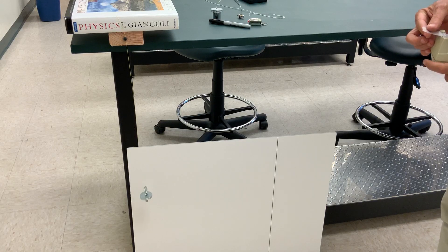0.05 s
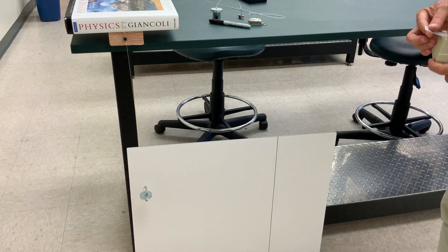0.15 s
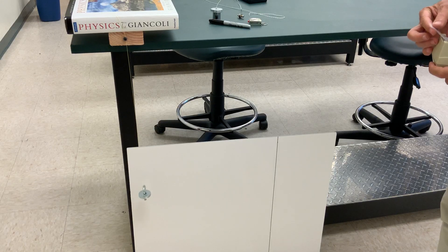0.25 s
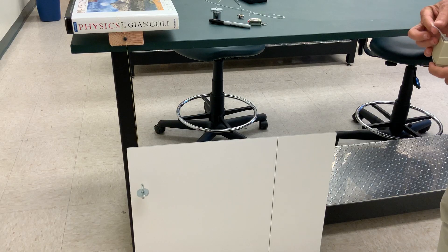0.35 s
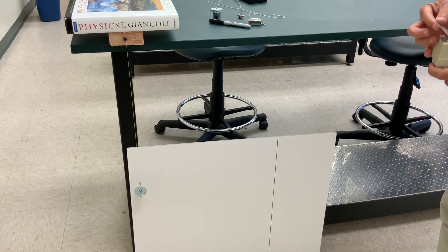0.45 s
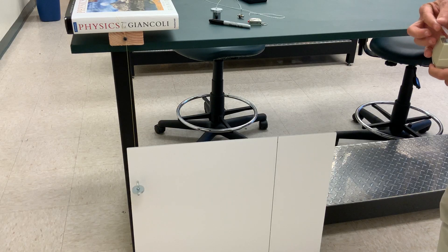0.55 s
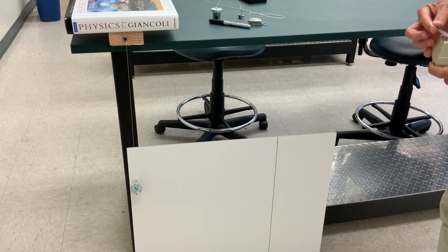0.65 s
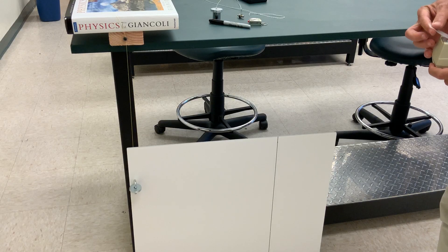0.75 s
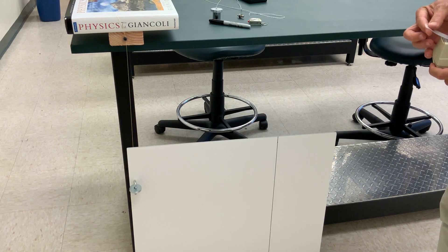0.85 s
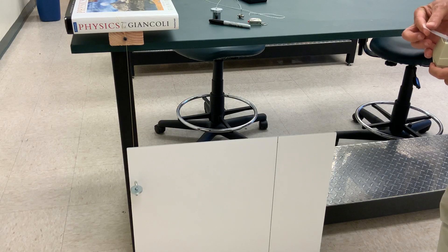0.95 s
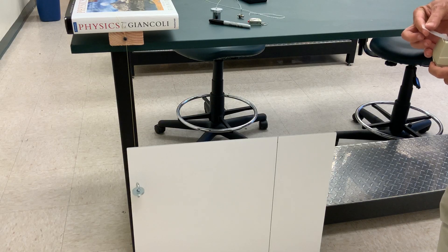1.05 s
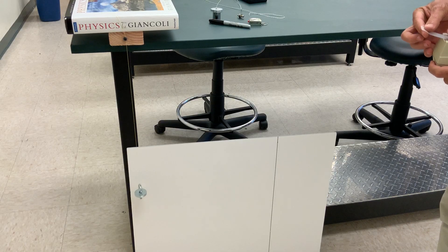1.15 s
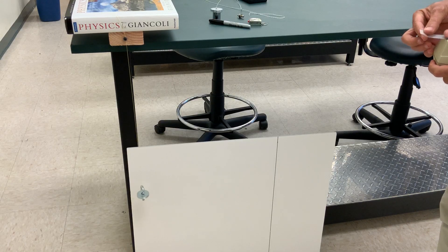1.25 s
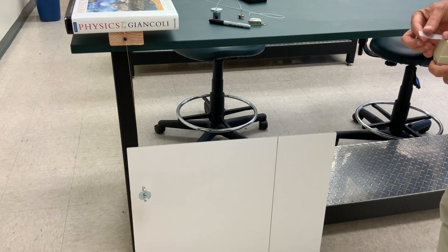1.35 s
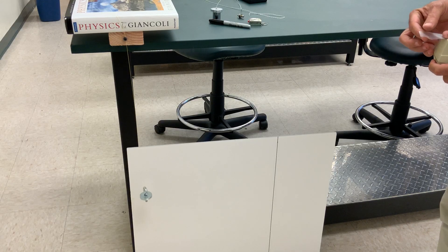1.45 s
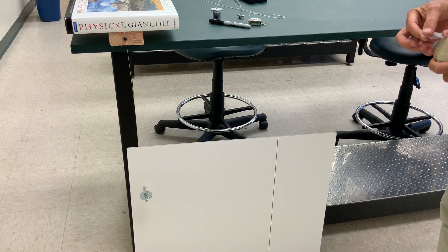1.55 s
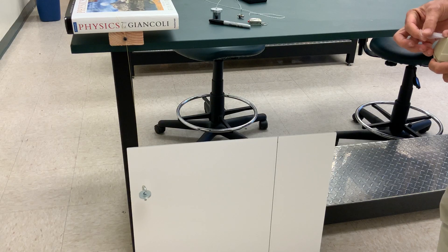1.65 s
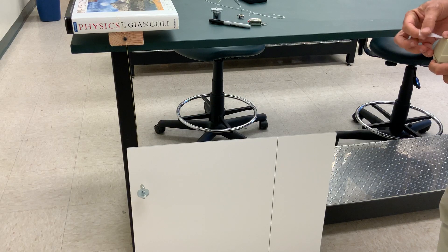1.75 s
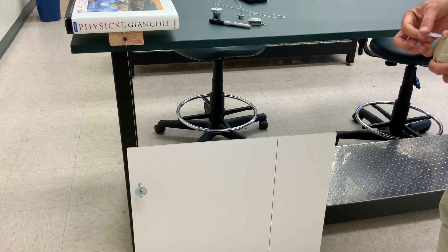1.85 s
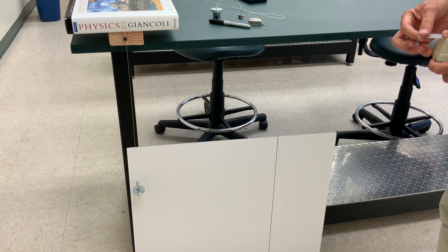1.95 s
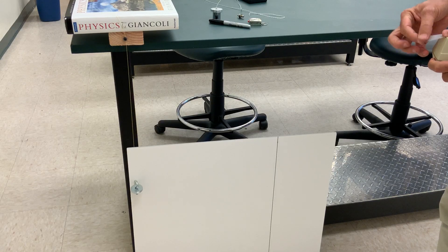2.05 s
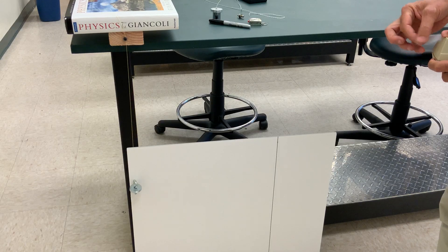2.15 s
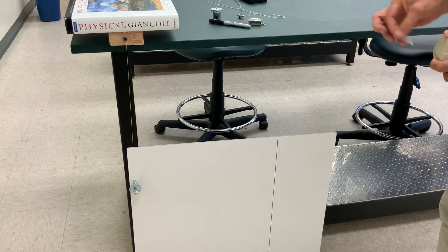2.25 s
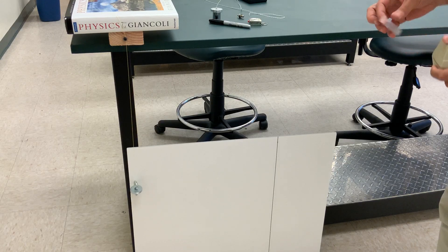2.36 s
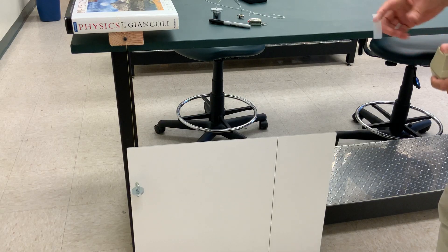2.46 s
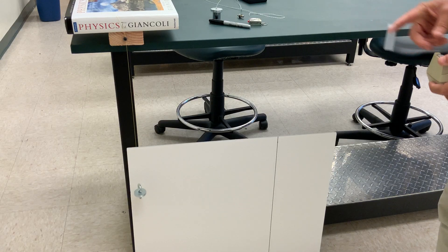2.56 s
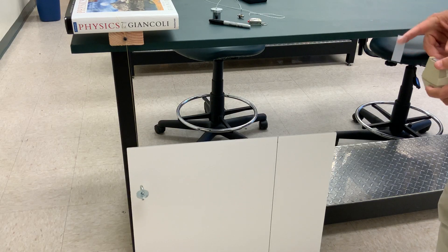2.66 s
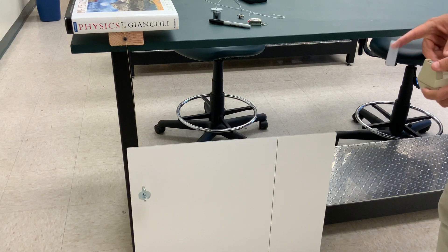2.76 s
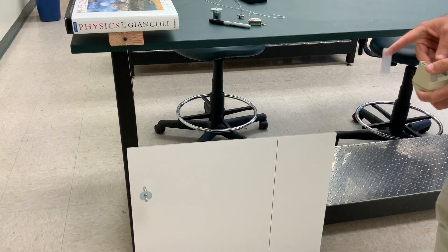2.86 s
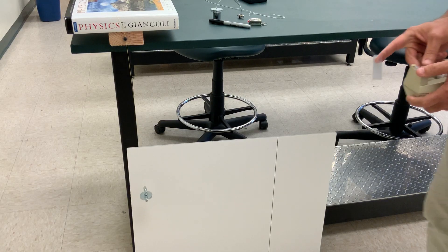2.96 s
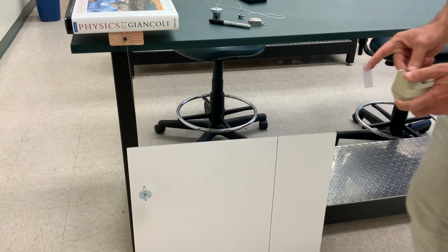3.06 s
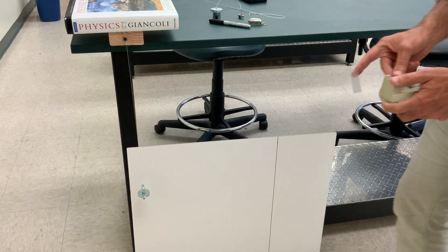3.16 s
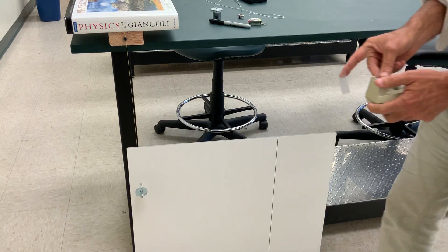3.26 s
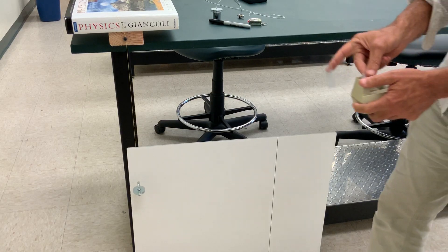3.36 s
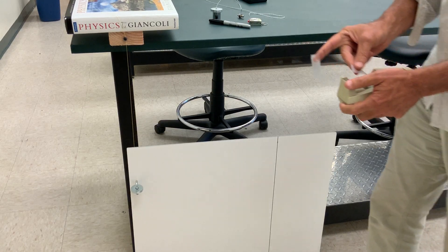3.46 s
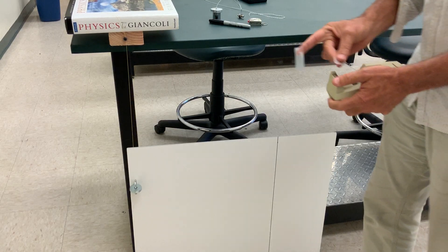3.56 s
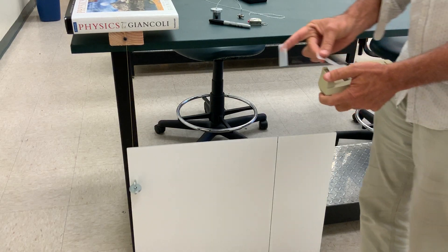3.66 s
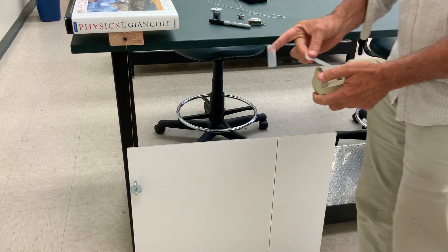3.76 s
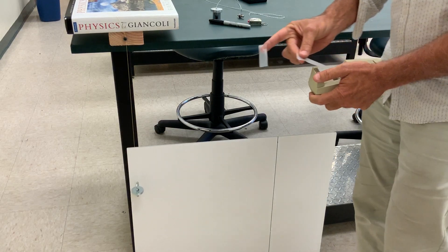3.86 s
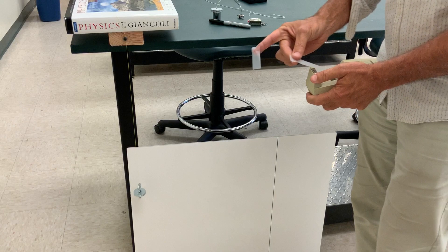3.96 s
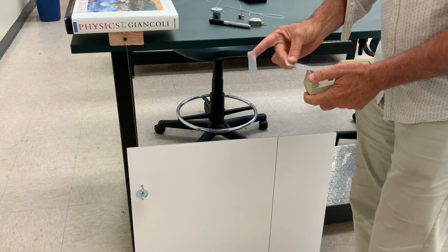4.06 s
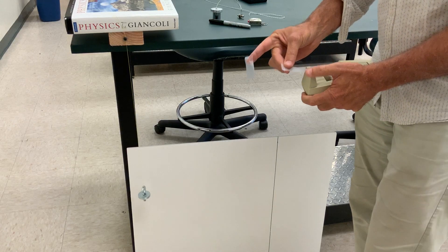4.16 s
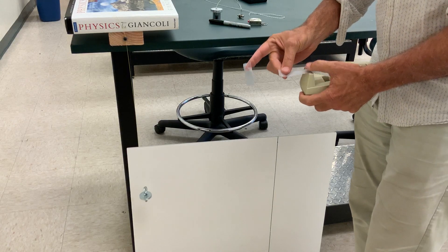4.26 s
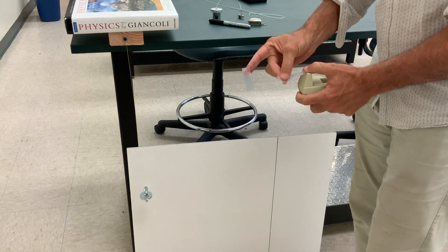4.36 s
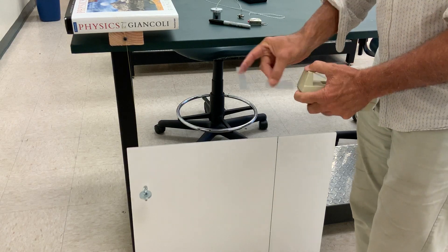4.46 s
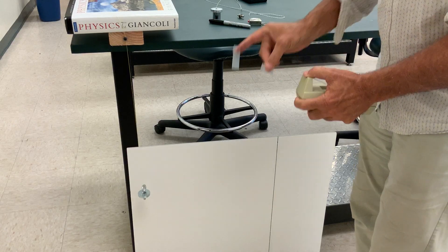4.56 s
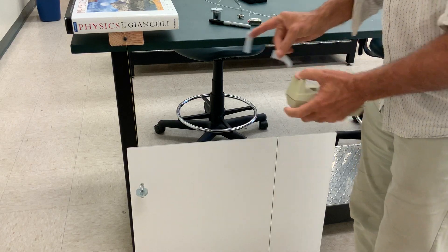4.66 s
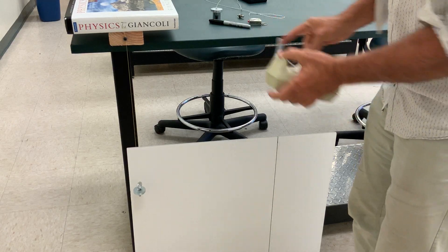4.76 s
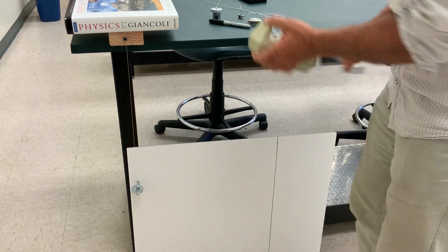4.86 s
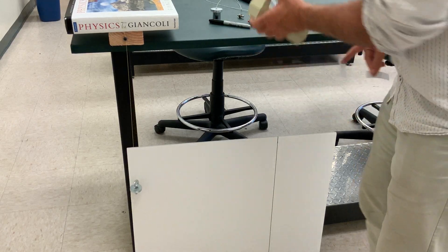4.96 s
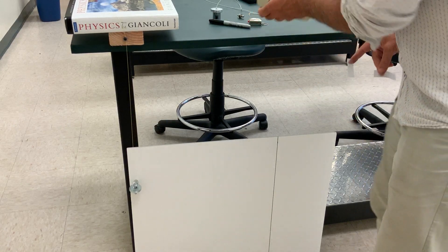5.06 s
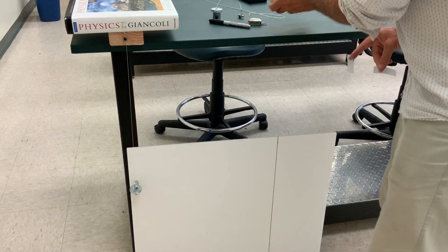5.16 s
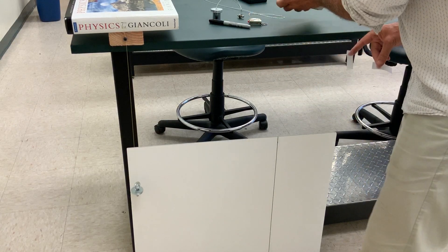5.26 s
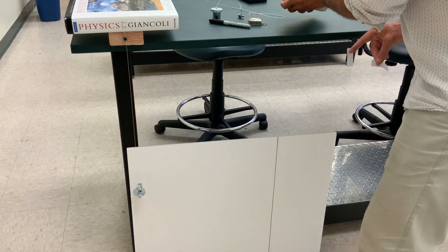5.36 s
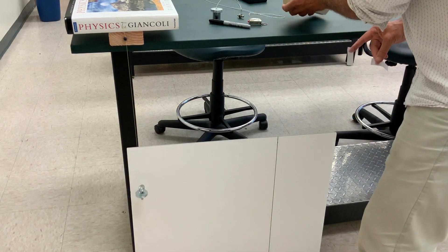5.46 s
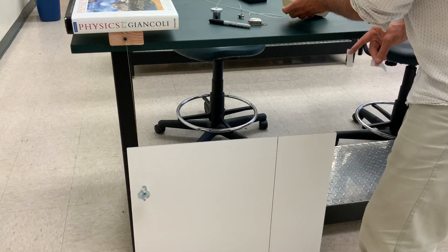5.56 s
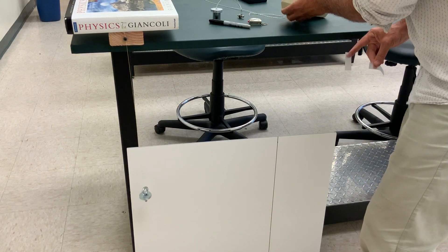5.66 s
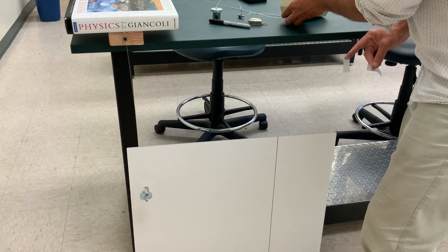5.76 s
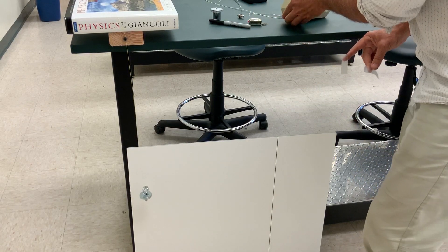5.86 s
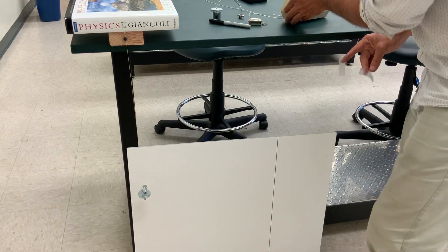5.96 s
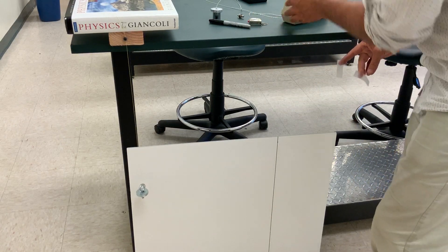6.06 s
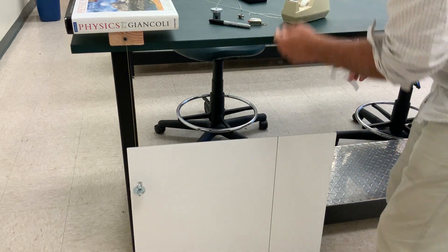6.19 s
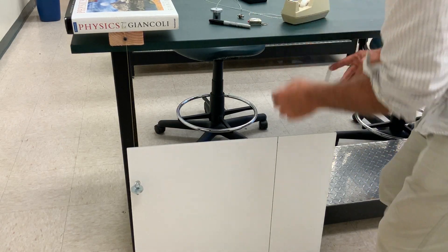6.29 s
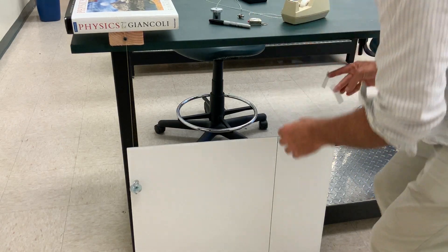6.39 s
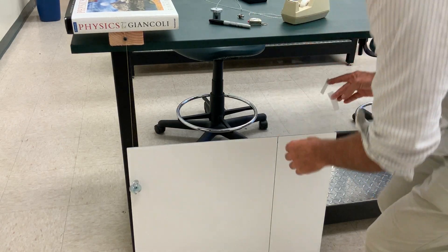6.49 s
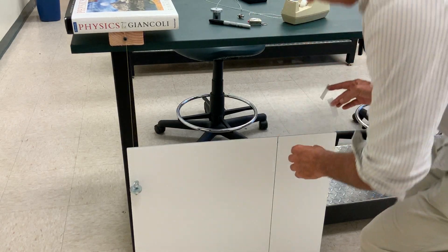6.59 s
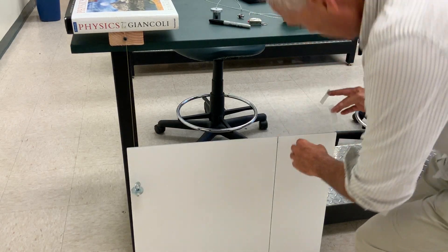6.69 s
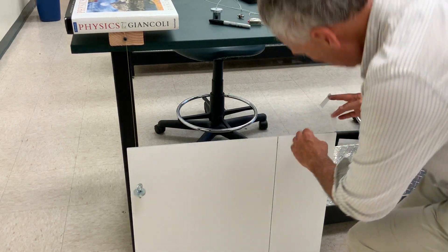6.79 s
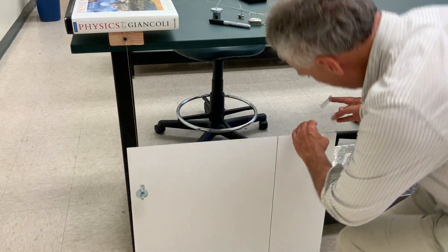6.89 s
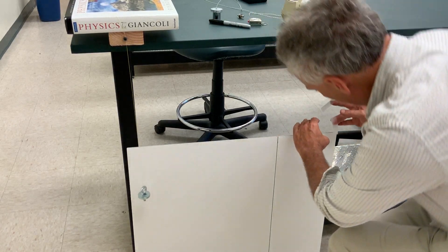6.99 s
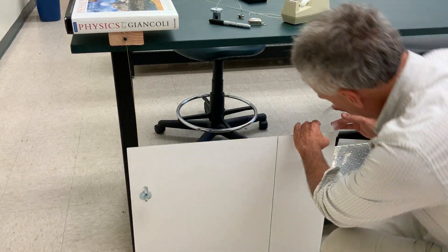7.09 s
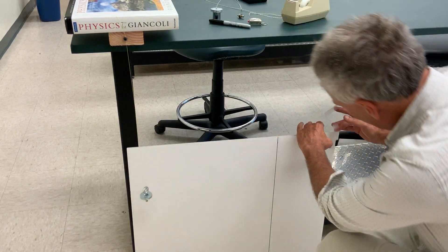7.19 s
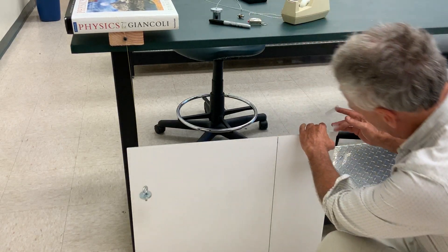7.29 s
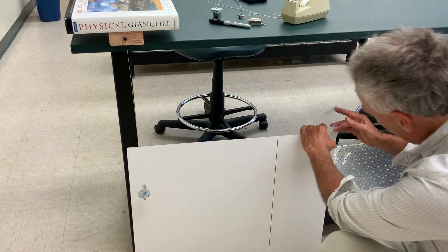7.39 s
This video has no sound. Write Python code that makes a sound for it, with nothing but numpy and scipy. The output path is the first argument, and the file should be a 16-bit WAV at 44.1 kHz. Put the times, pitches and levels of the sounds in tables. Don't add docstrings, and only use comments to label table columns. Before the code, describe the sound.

Close stereo pickup of tape being handled indoors: very brief snapping rips through a hollow plastic holder, echoing lightly off hard walls. Between them come sticky ticks, crinkles and a picked-free tape end whose pull sings softly upward. After the last rip, clothing brushes and plastic creaks, the holder thuds onto a tabletop, slides with a low boom, and soft rustling continues over steady ventilation.

```python
import sys
import numpy as np
from scipy import signal
from scipy.fft import rfft, irfft, next_fast_len
from scipy.io import wavfile
from scipy.ndimage import uniform_filter1d

SR = 44100
rng = np.random.default_rng(int(sys.argv[2]) if len(sys.argv) > 2 else 0)


def natural_amplitude(level_db):
    exponent = np.asarray(level_db, float) / 20
    return 10 ** exponent


def output_pcm(signal):
    pcm = np.clip(np.atleast_2d(signal).T, -1, 1) * 32767
    wavfile.write(sys.argv[1], SR, np.round(pcm).astype(np.int16))


N = 327698


def unit(x):
    return x / np.sqrt(np.mean(x ** 2) + 1e-20)


def in_time(rows):
    s, *columns = np.transpose(rows)
    t = np.arange(N) / SR
    return np.array([np.interp(t, s, c, left=-140, right=-140) for c in columns])


def band(x, low_hz, high_hz, order=2):
    edges = [low_hz, min(high_hz, .45 * SR)]
    return signal.sosfilt(signal.butter(order, edges, "band", fs=SR, output="sos"), x)


def low_pass(x, hz, order):
    return signal.sosfilt(signal.butter(order, hz, fs=SR, output="sos"), x)


def ring(x, hz, t60):
    r, w = natural_amplitude(-60 / (t60 * SR)), 2 * np.pi * hz / SR
    return signal.lfilter([0, np.sin(w)], [1, -2 * r * np.cos(w), r * r], x + 1e-18)


def flicker(rate, depth_db):
    knots = rng.standard_normal(4000)
    return natural_amplitude(depth_db * np.interp(np.arange(N) * rate / SR, np.arange(4000), knots))


def gestures(rows):
    t = np.arange(0, N + 64, 64) / SR
    power = 0
    for s, held, db, rise, fall in rows:
        outside = np.maximum((s - t) / rise, (t - s - held) / fall)
        power = power + natural_amplitude(2 * db - 40 * np.maximum(outside, 0))
    return np.interp(np.arange(N) / SR, t, power)


# pitch in Hz, level in dB per Hz.
AIR = [(50, -24.5), (88, -2.5), (115, 1.5), (140, 2), (175, -10.5), (230, -1.5), (300, -15), (450, -19),
       (800, -25), (1500, -31), (6400, -32), (11000, -34.5), (13300, -36), (14800, -32)]
# start in seconds, deep shake in dB, hum in dB.
STEPS = [(0.0, -61, -73), (.62, -67, -62), (1.5, -63, -65), (2.2, -61, -67), (2.67, -67, -64),
         (3.41, -68, -67), (3.65, -62, -64), (4.2, -65, -71), (4.47, -60, -59), (5.21, -67, -61),
         (5.59, -62, -57), (6.13, -58, -62), (6.79, -49, -61), (7.2, -65, -62)]


def ventilation():
    air_db, deep_db, hum_db = -70.5, -68, -72
    rise_s, fall_s = .35, .35
    hz = np.maximum(np.fft.rfftfreq(N, 1 / SR), 1)
    curve_hz, curve_db = np.transpose(AIR)
    colour = natural_amplitude(np.interp(np.log(hz), np.log(curve_hz), curve_db))
    air = unit(irfft(rfft(rng.standard_normal((2, N))) * colour, N))
    low = rng.standard_normal((2, N))
    shakes = [(s, 0, db, rise_s, fall_s) for s, db, _ in STEPS]
    hums = [(s, 0, db, rise_s, fall_s) for s, _, db in STEPS]
    deep = np.sqrt(natural_amplitude(2 * deep_db) + gestures(shakes))
    hum = np.sqrt(natural_amplitude(2 * hum_db) + gestures(hums))
    return natural_amplitude(air_db) * air + deep * unit(band(low, 21, 31)) + hum * unit(band(low, 52, 63))


# start in seconds, time held in seconds, level in dB,
# rise in seconds per 20 dB, fall in seconds per 20 dB.
FILM = [(0.0, .03, -67, .01, .08), (.91, .02, -68, .13, .04), (1.365, .04, -77, .015, .1),
        (1.6, .04, -67, .07, .07), (1.726, .01, -56, .03, .065), (1.87, .04, -78, .015, .08),
        (2.96, .2, -73, .22, .3), (3.272, .01, -60, .05, .05), (3.32, .07, -54, .006, .08),
        (3.6, .2, -64, .3, .2), (3.62, .02, -60, .02, .04), (3.66, .02, -60, .02, .04),
        (3.705, .02, -59, .008, .04), (3.92, .03, -66, .2, .06), (4.09, .06, -66, .04, .05),
        (4.76, .01, -68, .09, .2), (4.844, .01, -61, .15, .15), (5.02, .03, -56.5, .2, .09),
        (5.36, .06, -72, .4, .3), (5.56, .03, -64, .02, .25), (5.87, .01, -69, .2, .3),
        (6.075, .1, -58, .05, .13), (6.36, .01, -55, .09, .12), (6.466, .01, -57, .1, .15),
        (6.638, .01, -64, .17, .1), (6.7, .5, -63, .2, .5), (7.336, .02, -64, .2, .4)]
# start in
# seconds, time held in seconds, level in dB, # rise in seconds per 20 dB, fall in seconds per 20 dB.
CLOTH = [(0.0, .035, -71, .01, .06), (.146, .01, -73, .02, .07), (1.724, .015, -71, .006, .085),
         (1.904, .01, -81, .04, .075), (3.118, .01, -76, .3, .22), (3.272, .01, -73, .06, .15),
         (3.35, .1, -61, .03, .15), (3.52, .2, -72, .1, .3), (3.79, .02, -67, .3, .11),
         (4.065, .11, -63, .03, .1), (4.39, .01, -76, .12, .1), (4.844, .05, -67, .12, .2),
         (5.045, .01, -60, .2, .13), (5.15, .01, -70, .05, .13), (5.382, .01, -81, .2, .2),
         (5.57, .03, -66, .01, .2), (5.84, .06, -78, .2, .07), (6.07, .02, -62, .012, .12),
         (6.17, .03, -61, .14, .15), (6.347, .07, -62, .015, .12), (6.47, .04, -67, .05, .2),
         (6.625, .02, -62, .06, .13), (6.75, .45, -72, .2, .15), (7.21, .01, -67, .006, .075),
         (7.336, .01, -63, .06, .2)]
# start in seconds, time held in seconds, level in dB,
# rise in seconds per 20 dB, fall in seconds per 20 dB.
SOLES = [(.924, .01, -81, .11, .05), (1.726, .01, -75, .008, .08), (4.18, .01, -72, .2, .09),
         (4.37, .06, -69, .04, .02), (5.132, .01, -67, .03, .14), (6.078, .01, -58, .02, .15),
         (6.426, .01, -69, .12, .2), (6.646, .1, -69, .05, .08), (7.05, .05, -76, .1, .1),
         (7.336, .01, -72, .045, .3)]


def rustle():
    materials = [(FILM, (-25, -30, -20, 0)), (CLOTH, (0, -15, -6, -14)), (SOLES, (-8, 0, -22, -30))]
    power = 0
    for rows, colour in materials:
        power = power + natural_amplitude(np.array(colour))[:, None] ** 2 * gestures(rows)
    levels = np.sqrt(power)
    grains = rng.standard_normal((4, 2, N)) * natural_amplitude(1.5 * np.minimum(rng.exponential(1, N), 5))
    edges_hz = [(1400, 4300), (338, 1400), (4400, 7600), (9200, 25000)]
    together = flicker(70, depth_db=1.5)
    out = 0
    for level, x, hz in zip(levels, grains, edges_hz):
        out = out + level * together * flicker(40, depth_db=1) * unit(band(x, *hz, order=3))
    return out


# pitch in Hz, width in Hz, level in dB.
SHELL = [(1250, 60, -5), (1970, 60, -1), (2300, 70, -10), (5170, 50, -3), (5530, 50, -1), (6200, 80, 1),
         (6800, 90, 1)]


def shell(x):
    out = x
    for k, (hz, width, db) in enumerate(SHELL):
        gain = natural_amplitude(-3.0 + db) * (-1) ** k
        out = out + gain * ring(x, hz, 2.2 / width) * 2 * np.pi * width / SR
    return out


# start in seconds, level in dB.
GRIP = [
    (0.0, -10),
    (0.45, -6.5),
    (0.6, -11),
    (2.0, -13),
    (3.0, -10),
    (4.4, -9.5),
    (4.6, -10),
]


def snaps(table, crisp_hz, break_db):
    envelope, breaks, t = np.zeros((3, N)), np.zeros(N), np.arange(1500) / SR
    slower = np.array([[2.5], [1.5], [1]])
    for s, peak_db, mid_db, ms in table:
        grip_db = [db for since, db in GRIP if since <= s][-1]
        low_db = grip_db + .7 * mid_db
        at = round(s * SR)
        rise = 1 - np.exp(-t / (0.000076 * slower ** 2))
        shape = np.exp(-t * 1000 / max(ms, .2) / slower) * rise
        peaks = natural_amplitude(peak_db + np.array([[low_db], [mid_db], [0]]))
        envelope[:, at:at + 1500] += (peaks * shape)[:, :N - at]
        breaks[at + 10] = natural_amplitude(peak_db + break_db) / max(ms, .5)
    spray = rng.standard_normal((3, 2, N)) * natural_amplitude(.7 * np.minimum(rng.exponential(1, N), 4))
    holder = natural_amplitude(-5.0) * band(envelope[0] * unit(spray[0]), 660, 4000, order=3) * np.sqrt(SR / 7200)
    blade = natural_amplitude(-4.0) * band(envelope[1] * unit(spray[1]), 4000, 8800, order=3) * np.sqrt(SR / 8000)
    film = band(envelope[2] * unit(spray[2]) + breaks, crisp_hz, 19000, order=4)
    bright_film = film + natural_amplitude(3.5) * band(film, 12500, 17500, order=1)
    push = natural_amplitude(-26) * band(envelope[0] * unit(spray[2]), 240, 700) * np.sqrt(SR / 1000)
    return push + shell(holder + blade) + natural_amplitude(-4.0) * bright_film


# start in seconds, peak in dB, share passed to the holder in dB.
TICKS = [(0.1422, -57.5, -6), (0.827, -59, -21), (0.8927, -54, -21), (1.2372, -63, -6),
         (1.3616, -50.5, -30), (1.3772, -52, -22), (1.3918, -46, -20), (1.4992, -61, -16),
         (1.5655, -55.5, -22), (1.5943, -47, -30), (1.5997, -44, -32), (1.6363, -36, -18),
         (1.6482, -45, -22), (1.6923, -45, -28), (1.706, -41, -30), (1.7227, -31.5, -19), (1.7302, -46, -3),
         (1.8984, -45, -28), (2.1023, -58, -21), (3.3212, -53, -6), (3.7043, -50, -25), (3.8948, -52, -20),
         (3.9378, -52, -13), (4.3424, -60, -6), (4.9181, -44.5, -11), (4.9523, -47.5, -8),
         (5.0426, -40, -9), (5.056, -46, -4), (7.2086, -41, -9), (7.3153, -47, -1), (7.4095, -51, -3)]


def finger_ticks():
    crackle_ms = 1.6
    return snaps([(*row, crackle_ms) for row in TICKS], crisp_hz=11500, break_db=4)


# start in seconds, peak in dB,
# share passed to the holder in dB, crackle length in ms.
TEARS = [(0.469, -19.5, -17, 1.6), (0.473, -24, -15, 1.2), (0.4764, -29, -12, 1.2), (0.4804, -20, -18, 1.1),
         (0.4814, -18, -18, 0.6), (0.4848, -19, -9, 1.1), (0.4869, -21, -9, 1.4), (0.4921, -30, 2, 2),
         (0.497, -32, 3, 2), (2.204, -37, -4, 4.8), (2.2077, -29, -14, 2.9), (2.2131, -29.5, -12, 1.6),
         (2.2159, -20, -5, 0.89), (2.2178, -18.5, -7, 1.6), (2.2231, -22, -5, 1.3), (2.2306, -35.5, 2, 2.6),
         (2.2464, -35.5, -6, 0.55), (2.2524, -28, -17, 0.5), (4.4291, -34, -12.5, 0.7),
         (4.4331, -39, -6.5, 2.9), (4.4381, -29, -10, 4.0), (4.4425, -23, -13, 3.5),
         (4.4459, -22.5, -18, 2.2), (4.4487, -11, -12, 0.6), (4.4478, -22, -14, 1),
         (4.4524, -22, -12, 0.95), (4.4538, -20, -8, 0.5), (4.4769, -38, -9, 0.83)]


def tears():
    return snaps(TEARS, crisp_hz=7700, break_db=8)


# start in seconds,
# time held in seconds, level in dB, first pitch in Hz, last pitch in Hz.
RUBS = [(1.37, .06, -73, 14000, 14000), (1.562, .1, -66, 13500, 13000), (1.868, .05, -71, 14500, 14500),
        (3.262, .02, -68, 2100, 2000), (3.35, .1, -66, 1200, 1200), (4.055, .05, -73, 2300, 2400),
        (4.09, .07, -71, 3400, 3600), (4.14, .04, -68, 1780, 1740), (4.335, .03, -76, 2800, 2800),
        (4.362, .06, -72, 850, 750), (4.36, .06, -70, 380, 330), (4.22, .04, -80, 1500, 1500),
        (6.347, .06, -69, 2600, 2000), (6.347, .03, -68, 6000, 5500), (6.435, .075, -66, 3800, 5400),
        (6.43, .05, -70, 2200, 2300), (6.53, .06, -72, 4500, 3500), (6.617, .025, -69, 2400, 2100),
        (5.82, .2, -79, 1500, 1500), (4.8, .05, -72, 2200, 2200), (5.125, .045, -67, 1900, 1800),
        (5.128, .05, -75, 750, 650), (3.352, .042, -58, 9000, 9000), (3.352, .02, -62, 2200, 2300),
        (3.5, .33, -70, 5800, 5200), (5.122, .02, -66, 3000, 2900), (5.155, .012, -68, 3000, 3000),
        (6.078, .012, -53, 1400, 1500), (6.068, .035, -63, 5000, 5000), (6.1, .03, -61, 1400, 1500),
        (6.15, .055, -63, 2100, 2400), (6.15, .04, -62, 5500, 5500), (6.72, .4, -74, 5500, 5200),
        (5.78, .15, -75, 2200, 2200)]


def rubs():
    rise_s, fall_s = .012, .04
    out, t = np.zeros((2, N)), np.arange(N) / SR
    noise = rng.standard_normal((2, 2, N))
    for s, held, level_db, first_hz, last_hz in RUBS:
        part = slice(round((s - .1) * SR), round((s + held + .2) * SR))
        width_hz = .16 * first_hz
        wobble = low_pass(noise[..., part], width_hz, order=1)
        wobble = low_pass(wobble, 2 * width_hz, order=1)
        hz = np.interp(t[part], [s, s + held], [first_hz, last_hz])
        phase = 2 * np.pi * np.cumsum(hz) / SR
        level = np.sqrt(gestures([(s, held, level_db, rise_s, fall_s)])[part])
        out[:, part] += level * unit(wobble[0] * np.cos(phase) + wobble[1] * np.sin(phase))
    return out * flicker(90, depth_db=2.5)


# start in seconds,
# level in dB, ringing pitch in Hz, time to die by 60 dB in ms.
TOCKS = [(3.264, -62, 2140, 8), (3.349, -47, 2125, 14), (3.11, -68, 1490, 7.4), (4.16, -59, 1730, 14),
         (4.376, -63, 420, 9), (4.88, -63, 1730, 21), (4.918, -57, 1760, 18), (4.962, -58, 2270, 19),
         (5.003, -62, 2200, 15), (5.04, -54.5, 1950, 23), (5.055, -63, 2120, 10), (4.95, -63, 2270, 12),
         (5.163, -62, 1800, 12), (5.125, -55, 2820, 5.3), (5.135, -56, 3080, 5.5), (6.068, -56, 700, 6),
         (6.646, -54, 560, 20), (6.657, -56, 740, 23)]


def tocks():
    out, t = np.zeros((2, N)), np.arange(4000) / SR
    for s, level_db, hz, ms in TOCKS:
        contact = rng.standard_normal((2, 4000)) * np.exp(-t / 0.004)
        tone = ring(band(contact, hz / 2, hz * 2), hz, min(ms, 30) / 1000)
        at = round(s * SR)
        out[:, at:at + 4000] += natural_amplitude(level_db - 10) * tone
    return out


# start in seconds, peak in dB,
# share passed to the holder in dB, crackle length in ms.
PICKS = [(3.3293, -47, -12, 1.5), (3.3490, -28.5, -13, 1.8), (3.3605, -42, -12, 3), (3.3851, -26, -16, 1.8),
         (3.3905, -38, -18, 2), (3.3992, -33, -21, 2.5), (3.4012, -33, -24, 1.5), (3.4062, -34, -24, 2),
         (3.4085, -36, -24, 2), (3.4143, -26, -19, 1.6), (3.4158, -28, -22, 3), (3.4200, -31, -22, 2.2),
         (3.4222, -30, -22, 2), (3.4250, -32, -22, 2.5), (3.4285, -32, -16, 2), (3.4305, -31, -16, 2),
         (3.4345, -35, -18, 2.5), (3.4380, -33, -18, 2), (3.4421, -15, -25, 0.6), (3.4470, -30, -10, 1.3)]


def picks():
    return snaps(PICKS, crisp_hz=7400, break_db=8)


# time in seconds, pitch in Hz, level in dB.
DRAW = [
    (3.33, 1099, -82),
    (3.4, 1139, -71),
    (3.6, 1200, -73),
    (3.8, 1336, -76),
    (3.9, 1410, -75),
    (4.03, 1425, -80),
    (4.08, 1420, -98),
]


def drawn_tape():
    hz, level_db = in_time(DRAW)
    wobble = low_pass(rng.standard_normal((2, 2, N)), 130.0, order=2)
    phase = 2 * np.pi * np.cumsum(np.maximum(hz, 0)) / SR
    return natural_amplitude(level_db) * unit(wobble[0] * np.cos(phase) + wobble[1] * np.sin(phase))


# start in seconds, blow in dB, contact softness in Hz.
KNOCKS = [(5.552, -52, 2500), (5.559, -38, 3500), (5.563, -33, 1800), (5.571, -33, 2600), (5.574, -29, 700),
          (5.584, -31, 800), (5.592, -28, 700), (5.609, -31, 500), (5.622, -33, 600), (5.643, -35, 600),
          (6.074, -53, 500)]
# pitch in Hz, level in dB, time to die by 60 dB in seconds.
TABLE = [(134, -25, 0.4), (207, -25, 0.4), (236, -21, .25), (293, -21, 0.22), (355, -27, 0.3),
         (405, -11, 0.18), (500, -17, .3), (587, -18, 0.62), (583, -8, 0.27), (330, -22, .2),
         (642, -23, 0.15), (895, -31, 0.2), (1077, -25, 0.6), (1180, -21, 0.3)]


def table_knocks():
    out, t = np.zeros((2, N)), np.arange(30000) / SR
    for s, blow_db, soft_hz in KNOCKS:
        click = natural_amplitude(blow_db) * (t == 0)
        modes = sum(natural_amplitude(db + rng.normal(0, 1.6)) * ring(click, hz, t60) for hz, db, t60 in TABLE)
        crack = natural_amplitude(blow_db + 10) * rng.standard_normal((2, 30000)) * np.exp(-t / 0.0046)
        thud = band(band(crack, 110, soft_hz, order=1), 120, 2100)
        at = round(s * SR)
        out[:, at:at + 30000] += modes + thud
    return out


# start in seconds, peak in dB,
# share passed to the holder in dB, crackle length in ms.
BASE_TICKS = [
    (5.557, -42, 1, 2.8),
    (6.066, -49, -12, 4.1),
]


def base_ticks():
    return snaps(BASE_TICKS, crisp_hz=7700, break_db=8)


# time in seconds, level in dB.
SLIDE = [
    (6.06, -80),
    (6.068, -60),
    (6.076, -46),
    (6.095, -43),
    (6.125, -49),
    (6.156, -43.5),
    (6.2, -46),
    (6.25, -53),
    (6.38, -72),
]
# pitch in Hz, width in Hz, level in dB.
SLIDE_BODY = [
    (128, 46, 7.5),
    (214, 20, 4.5),
    (180, 86, -20.5),
]


def table_slide():
    rough = rng.standard_normal((2, N)) * flicker(35, depth_db=3.0)
    body = sum(natural_amplitude(db) * unit(ring(rough, hz, np.log(9) / width)) for hz, width, db in SLIDE_BODY)
    even = body / np.sqrt(uniform_filter1d(body ** 2, size=1500))
    return natural_amplitude(in_time(SLIDE)[0]) * even


# pitch in Hz, time to die by 60 dB in seconds, level in dB.
ROOM = [(148.2, 0.92, -3), (278, 0.6, 0), (556, 0.6, -1.5), (1200, 0.46, 1.5), (2400, 0.42, 1),
        (5070, 0.47, -1.5), (9000, 0.43, -4.5), (14500, 0.29, -13)]


def classroom(x):
    t, answer = np.arange(SR) / SR, 0
    for hz, t60, level_db in ROOM:
        octave = unit(band(rng.standard_normal((2, SR)), hz / 1.37, hz * 1.395))
        tail = octave * natural_amplitude(-60 * t / t60)
        answer = answer + natural_amplitude(level_db) * tail * np.sqrt(hz / SR / SR * 30)
    answer = answer * np.clip((t - .002) / 0.004, 0, 1)
    return signal.fftconvolve(x, answer, axes=1)[:, :N]


def scene():
    background = ventilation() + rustle()
    hard = finger_ticks() + tears() + table_knocks() + base_ticks()
    near = tocks()
    picked = picks()
    wet = classroom(hard + natural_amplitude(-4.5) * picked + natural_amplitude(-2.5) * near)
    rubbed = rubs() + drawn_tape() + table_slide()
    return background + hard + picked + near + wet + rubbed


def top_cut(x):
    return signal.sosfilt(signal.butter(12, 16810, fs=SR, output="sos"), x)


# pitch in Hz, likeness from 0 to 1.
LIKENESS = [(20, 0.96), (80, .9), (250, 0.79), (450, 0.5), (1000, 0.58), (1300, .15), (2000, .58),
            (2800, .2), (3300, .68), (3800, .25), (4700, .12), (5300, .4), (6500, .6), (7300, .56),
            (7800, .24), (9300, .56), (9750, 1)]
# pitch in Hz, lead in cycles.
LEFT_TURNS = [(0, 0), (300, .05), (700, .32), (1050, .04), (1290, 0), (1400, .37), (1950, 0), (2750, -.5),
              (3050, -.88), (3900, -1.46), (4250, -1.95), (4750, -2.36), (5150, -2.95), (5900, -3.5),
              (6500, -4), (7250, -4.5), (8000, -5), (9050, -5.48), (9860, -6), (16008, -10)]


def record(dry):
    size = next_fast_len(N + 4096)
    hz = np.fft.rfftfreq(size, 1 / SR)
    other, right = rfft(dry, size)
    curve_hz, curve = np.transpose(LIKENESS)
    alike = np.clip(np.interp(np.log(hz + 1), np.log(curve_hz), curve), 0, 1)
    turn = np.exp(2j * np.pi * np.interp(hz, *np.transpose(LEFT_TURNS)))
    blend = alike * right + np.sqrt(1 - alike ** 2) * other
    left = natural_amplitude(-.8 * (1.5 - alike ** 8)) * turn * blend
    top = 1 / (1 + (hz / 15800) ** 400)
    mix = irfft(np.array([left, right]) * top, size)[:, :N]
    return top_cut(mix)


dry = scene()
out = record(dry)
output_pcm(out)
```